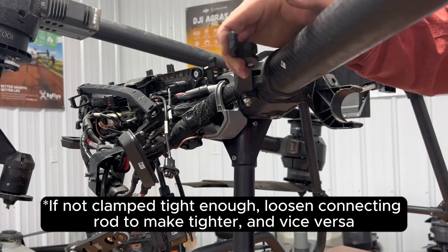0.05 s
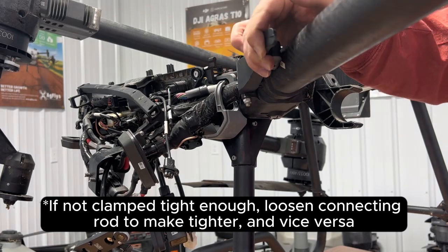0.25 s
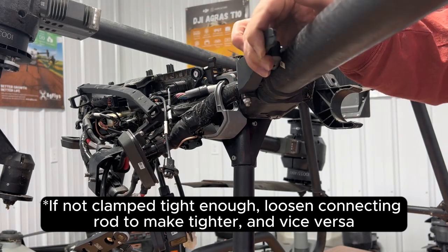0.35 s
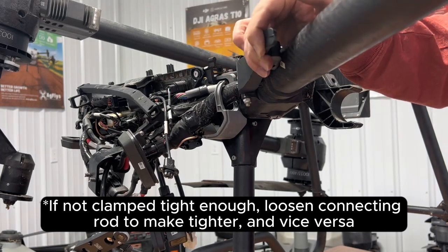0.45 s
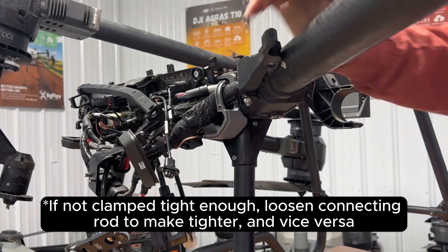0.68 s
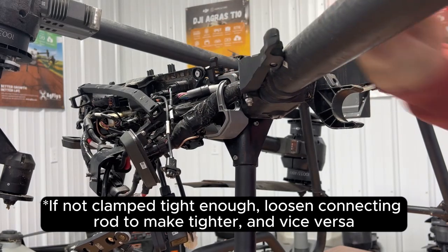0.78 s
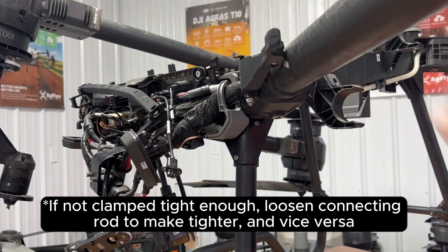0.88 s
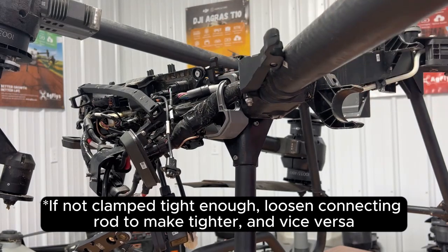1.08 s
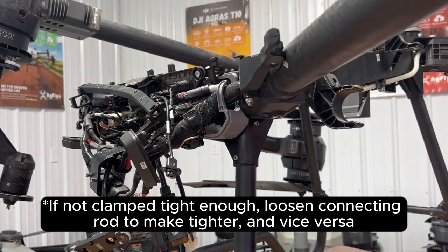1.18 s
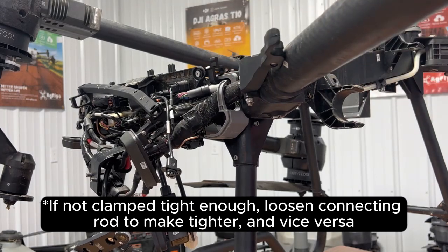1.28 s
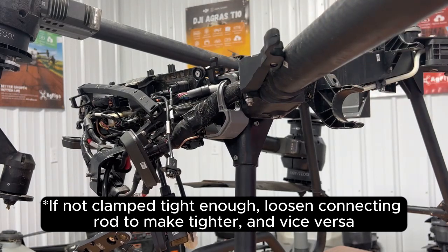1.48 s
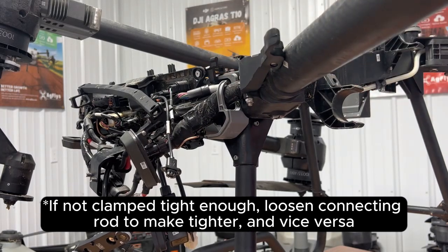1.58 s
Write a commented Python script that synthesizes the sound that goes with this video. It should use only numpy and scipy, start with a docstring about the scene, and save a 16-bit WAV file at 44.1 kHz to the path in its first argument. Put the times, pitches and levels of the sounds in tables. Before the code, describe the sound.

In an echoing workshop, a nearby clamp locks onto a tube with a single sharp clack and a short ring. Afterwards a hand slips off softly and cloth rustles, with low ventilation noise underneath.

```python
"""In a reverberant workshop, a lever clamp on a tubular drone arm is pushed over centre and snaps shut.
Friction makes the lever scrape briefly; it lands with a hard clack, the impulse response of the damped
clamp. The blow excites the arm's normal modes, and the hall returns echoes and a diffuse tail.
Fingers tick and slide on the lever and a sleeve rustles away, over ventilation noise and a low hum."""
import sys
import numpy as np
from scipy import signal
from scipy.fft import rfft, irfft, next_fast_len
from scipy.io import wavfile
from scipy.ndimage import uniform_filter1d

SR = 44100
rng = np.random.default_rng(int(sys.argv[2]) if len(sys.argv) > 2 else 0)


def bounce(signal):
    """Save signal as a 16-bit WAV file at the path given by the first command-line argument."""
    frames = np.transpose(np.atleast_2d(signal))
    limited = np.clip(frames, -1, 1)
    pcm = np.round(limited * 32767).astype(np.int16)
    wavfile.write(sys.argv[1], SR, pcm)


N = 72765
SNAP_S = .2298
FFT_SIZE = next_fast_len(N, True)
FFT_HZ = np.fft.rfftfreq(FFT_SIZE, 1 / SR)


def undb(db):
    """Amplitude ratio of a level in decibels."""
    return 10 ** (np.asarray(db) / 20)


def on_log(points, hz):
    """Interpolate a (frequency [Hz], value) table on a logarithmic frequency axis."""
    frequencies, values = np.array(points, float).T
    return np.interp(np.log(np.maximum(hz, 1)), np.log(frequencies), values)


def since(start):
    """Seconds since a moment, zero before it."""
    return np.maximum(np.arange(N) / SR - start, 0)


def fade(t, t60, rise_s):
    """Envelope of a damped vibration: a quick rise and an exponential decay of 60 dB in t60."""
    return (1 - np.exp(-t / rise_s)) * np.exp(-np.log(1000) * t / t60)


def envelope(points):
    """Amplitude along a (time [s], level [dB]) table."""
    times, levels = np.array(points).T
    return undb(np.interp(since(0), times, levels))


def shape(x, spectrum):
    """Zero-phase filtering by a (frequency [Hz], gain [dB]) table."""
    return irfft(rfft(x, FFT_SIZE) * undb(on_log(spectrum, FFT_HZ)), FFT_SIZE)[..., :N]


def wander(rate_hz):
    """Low-passed noise of unit standard deviation, for random modulation."""
    span = max(int(SR / rate_hz), 1)
    drift = rng.standard_normal(N)
    for _ in range(2):
        drift = uniform_filter1d(drift, span, mode="wrap")
    return drift / drift.std()


def noise(spectrum, width=None, grain_db=0):
    """Coloured mid-side noise of unit rms; fast amplitude modulation makes it grainy."""
    white = rng.standard_normal((2, N)) * undb(grain_db * wander(600))
    mid, side = shape(white, spectrum)
    if width is not None:
        side = shape(side, width)
    stereo = np.array([mid + side, mid - side])
    return stereo / stereo.std()


def ventilation():
    """Steady broadband air noise and two low hum tones that waver in amplitude and phase."""
    # air noise (frequency [Hz], relative density [dB])
    spectrum = [(20, -43), (45, 0.5), (70, 5), (115, 2.5), (160, -7), (280, -7.5), (450, -13.5), (700, -16),
                (1100, -6.5), (1500, -13.5), (2000, -19.5), (2700, -32), (4500, -38.5), (8000, -46.5),
                (15000, -49.5)]
    # its stereo width (frequency [Hz], side over mid [dB])
    width = [(60, -28.5), (110, -20.5), (200, -11.5), (380, -3.5), (700, -6), (1300, 2.5), (4400, -2),
             (15000, 3)]
    # hum tones (frequency [Hz], base level [dB])
    tones = [(117, -70.5), (194, -76)]
    # swells of the hum (time [s], gain [dB])
    swells = [(0, 4), (.77, 1), (.82, 13), (.88, -1), (1.3, 7), (1.65, -6.5)]
    air, hum = noise(spectrum, width) * undb(-56), 0
    for hz, db in tones:
        amplitude = np.sqrt(2) * undb(db) * (1 + .5 * wander(7))
        hum += amplitude * np.sin(2 * np.pi * hz * since(0) + wander(4.6))
    return (air + hum * envelope(swells)) * undb([[-2.5], [0]])  # weaker on the left


def hand_slide():
    """Sliding friction: the hand rubs off the lever, and the fingertips leave with a thin hiss."""
    # rub and hiss (frequency [Hz], relative density [dB])
    rub_spectrum = [(800, -46), (2500, 7), (5000, 6), (7000, -0.5), (11000, 3.5), (12500, -24),
                    (15000, 2.5)]
    hiss_spectrum = [(5000, -30.5), (9800, -14), (11000, 2), (12000, -14.5), (15000, -25)]
    # their envelopes (time [s], level [dB])
    rub_levels = [(0, -70.5), (.07, -104), (.15, -81), (.2, -76), (.25, -107), (.6, -92), (.67, -75),
                  (.708, -61), (.736, -66.5), (.765, -56.5), (.79, -68.5), (.825, -71.5), (.855, -65.5),
                  (.93, -77.5), (1.0, -100.5)]
    hiss_levels = [(.8, -96), (.84, -78), (.865, -75), (.93, -78.5), (1.0, -100)]
    rub = noise(rub_spectrum, grain_db=.5) * envelope(rub_levels)
    return rub + noise(hiss_spectrum) * envelope(hiss_levels)


def finger_ticks():
    """Light impacts of fingers and lever: brief transients, each with its own spectral tilt."""
    # touches (time [s], level [dB], T60 [s], downward tilt [dB/octave])
    touches = [(.104, -60, 0.017, -11), (.193, -62, .03, -15), (0.613, -59, .007, -9),
               (.771, -49.5, 0.024, 5.5)]
    # a tick before tilting (frequency [Hz], relative density [dB])
    spectrum = [(200, -20), (1800, -10), (2400, 6), (5000, -7.5), (9000, -5.5), (15000, -18.5)]
    out = 0
    for start, db, t60, tilt in touches:
        tilted = [(hz, level - tilt * np.log2(hz)) for hz, level in spectrum]
        out += noise(tilted) * undb(db) * fade(since(start), t60, rise_s=.00027)
    return out


def lever_scrape():
    """Friction noise that grows as the lever swings and stops just after it lands."""
    # scrape (frequency [Hz], relative density [dB])
    spectrum = [(300, -18.5), (1500, -20.5), (1900, -9), (2100, -8), (2350, -1), (2800, -23.5), (3600, -26),
                (5200, -20.5), (8000, -35), (15000, -41.5)]
    # its stereo width (frequency [Hz], side over mid [dB])
    width = [(300, -3), (2100, -11), (5000, 1.5)]
    # its envelope (time [s], level [dB])
    levels = [(.212, -69), (.218, -47.5), (.226, -43), (.23, -36.5), (.233, -60)]
    t = since(0)
    moving = (t > levels[0][0]) & (t <= levels[-1][0])
    return noise(spectrum, width, grain_db=1) * envelope(levels) * moving


def clamp_response(start, size=2048):
    """Impulse response of the heavily damped clamp; bending-wave dispersion delays low frequencies."""
    # a body hump, a bright shelf, then a steep fall (frequency [Hz], relative level [dB])
    spectrum = [(30, -65), (100, -49), (160, -37.5), (250, -23), (550, -6.5), (830, 0), (1100, -3),
                (1450, -8.5), (1950, -18), (2300, -12), (3120, -16.5), (3400, -43), (6000, -44.5),
                (16000, -56.5)]
    bending_delay_s, bending_hz = .00036, 1030  # group delay at this frequency
    hz, first = np.fft.rfftfreq(size, 1 / SR), int(start * SR)
    magnitude = undb(on_log(spectrum, hz) + 27)
    cepstrum = irfft(np.log(magnitude))
    cepstrum[1:] *= 2  # folding the cepstrum gives a causal, minimum-phase response
    cepstrum[size // 2:] = 0
    lag_cycles = hz * (start - first / SR) + 2 * bending_delay_s * np.sqrt(hz * bending_hz)
    ring = irfft(np.exp(rfft(cepstrum) - 2j * np.pi * lag_cycles))
    return np.pad(ring, (first, N - first - size))


def lever_clack():
    """Impact excitation: each of two quick contacts drives the clamp and gives a bright crack."""
    # contacts of the landing lever (time [s], relative level [dB])
    contacts = [(0.2297, 3.5), (0.2326, -6)]
    # crack (frequency [Hz], relative density [dB])
    spectrum = [(1500, -14), (3000, 1), (3800, 8), (5000, -1), (6300, -1), (7200, -10), (8200, 1.5),
                (9700, 3.5), (12000, -7), (15500, -2)]
    left_lag_s, left_db = .00034, -.5  # the sound reaches the right side first
    crack, out = noise(spectrum) * undb(-21), np.zeros((2, N))
    for start, db in contacts:
        for channel, arrival in enumerate((start + left_lag_s, start)):
            burst = crack[channel] * fade(since(arrival), t60=.009, rise_s=.0006)
            out[channel] += undb(db) * (clamp_response(arrival) + burst)
    return out * undb([[left_db], [0]])


def arm_ring():
    """Free vibration in damped normal modes; the higher ones reach the two sides out of phase."""
    # modes of arm and frame (frequency [Hz], level [dB], T60 [s])
    modes = [(119, -40.5, 0.64), (185, -34, 0.39), (199.7, -32.5, 0.29), (214.7, -25.5, .4),
             (355.7, -40, 0.47), (392, -40, .45), (482, -38, 1), (496.5, -40.5, 0.62), (587, -35, 0.73),
             (626, -34, 0.91), (811, -29.5, 0.59), (840, -37, .65), (1047, -48.5, 0.59), (1270, -43, 0.776),
             (1594, -38.5, .6), (2180, -41.5, .65), (2385, -40, .75)]
    full_spread_hz = 700
    t, out = since(SNAP_S), 0
    for hz, db, t60 in modes:
        phase = rng.uniform(-1, 1) * min(hz / full_spread_hz, 1) * np.array([[1], [-1]])
        out += undb(db) * np.sin(2 * np.pi * hz * t + phase) * fade(t, t60, rise_s=.0046)
    return out


def hall_tail(bands=14):
    """Diffuse reverberation: each band decays exponentially, the highest treble fastest."""
    # reverberant field (frequency [Hz], relative density [dB])
    spectrum = [(40, -54.5), (80, -39.5), (150, -24), (210, -16.5), (300, -12), (380, -2.5), (600, 0.5),
                (900, -8), (1300, -11), (1750, -10), (2050, -15), (2350, -15), (2800, -20.5), (3400, -27.5),
                (5000, -29), (7000, -36), (10000, -37), (15000, -49)]
    # its stereo width (frequency [Hz], side over mid [dB])
    width = [(100, -22), (200, -7.5), (380, -10), (700, 0.5), (1300, 1.5), (2400, -7.5), (5000, 0.5),
             (15000, 1.5)]
    # reverberation time (frequency [Hz], T60 [s])
    decay_times = [(100, 0.607), (300, 0.55), (600, 0.77), (1200, 0.82), (2600, 0.83), (5000, 0.89),
                   (9000, 0.5), (15000, .33)]
    t, out = since(SNAP_S + .0025), 0
    field = rfft(noise(spectrum, width), FFT_SIZE) * undb(-21)
    centres = np.geomspace(100, 15000, bands)
    for centre, weights in zip(centres, np.eye(bands)):
        triangle = on_log(np.c_[centres, weights], FFT_HZ)
        band = irfft(field * triangle, FFT_SIZE)[:, :N]
        out += band * fade(t, on_log(decay_times, centre), rise_s=.0026)
    return out


def hall_echoes():
    """Early reflections: floor, bench and walls return delayed copies of the clamp's response."""
    # echoes (delay [s], gain [dB], left over right [dB], left lag [s])
    reflections = [(.0068, -23, 23, -.0003), (.0178, -15, -9, 0.014), (.0205, -22, 3.5, 0.0035),
                   (.0375, -21, 9, .0002), (.0458, -17.5, -2, .0001), (.0625, -42, 18, -.0001)]
    out = np.zeros((2, N))
    for delay, db, pan_db, left_lag in reflections:
        out[0] += undb(db + pan_db / 2) * clamp_response(SNAP_S + delay + left_lag)
        out[1] += undb(db - pan_db / 2) * clamp_response(SNAP_S + delay)
    return out


def sleeve_rustle():
    """Cloth friction: grainy noise that swells and ebbs as the sleeve moves away."""
    # rustle (frequency [Hz], relative density [dB])
    spectrum = [(200, 4.5), (600, 12), (1500, 2.5), (2300, -2.5), (2700, 2), (3300, 0.5), (4500, 0.5),
                (6000, -4.5), (7500, -13.5), (10000, -6.5), (15000, -19.5)]
    # its envelope (time [s], level [dB])
    levels = [(1.12, -102), (1.18, -78.5), (1.21, -65), (1.27, -75.5), (1.335, -82), (1.358, -61),
              (1.395, -63), (1.415, -64), (1.54, -75.5), (1.6, -68.5), (1.65, -69)]
    return noise(spectrum, grain_db=.5) * envelope(levels)


def scene():
    """Superposition of the snap and its reverberation, the handling and the ventilation."""
    snap = lever_clack() + arm_ring() + hall_tail() + hall_echoes()
    handling = lever_scrape() + hand_slide() + sleeve_rustle() + finger_ticks()
    return snap + handling + ventilation()


def record(dry):
    """Soft saturation rounds the highest peak; an elliptic low-pass cuts the extreme treble."""
    ceiling, cutoff_hz = .93, 15800
    rounded = dry / (1 + (dry / ceiling) ** 10) ** (1 / 10)
    return signal.sosfilt(signal.ellip(8, .2, 70, cutoff_hz, fs=SR, output="sos"), rounded)


dry = scene()
out = record(dry)
bounce(out)
```